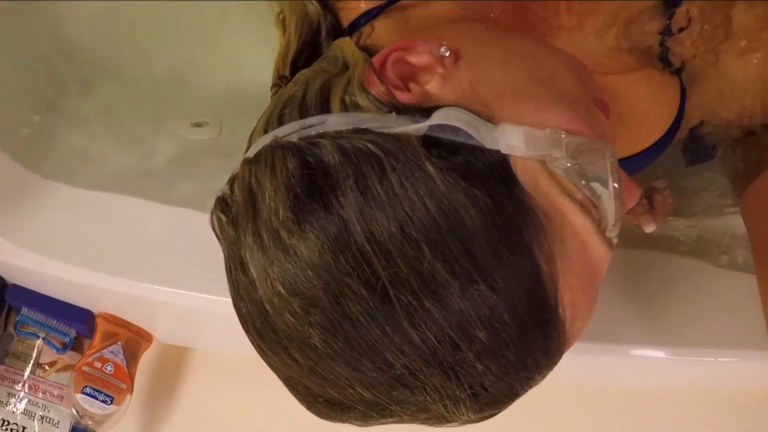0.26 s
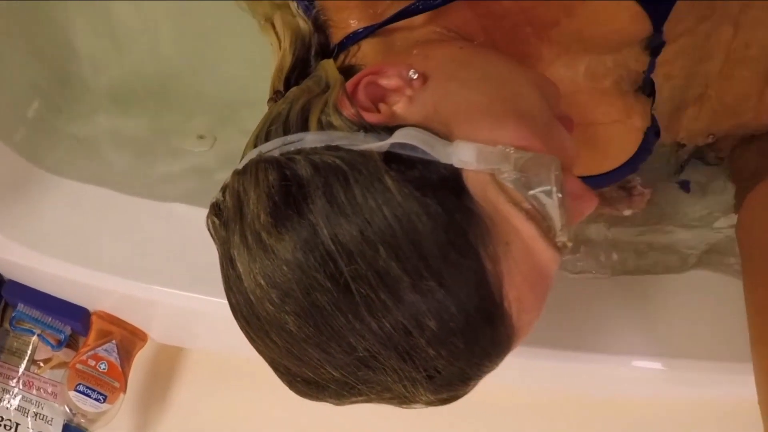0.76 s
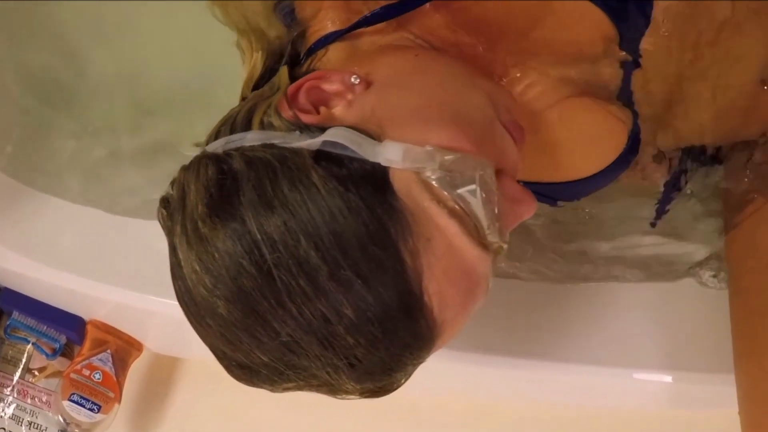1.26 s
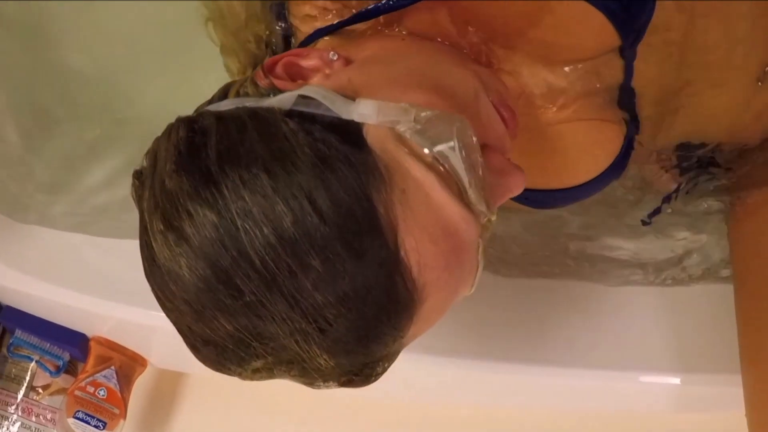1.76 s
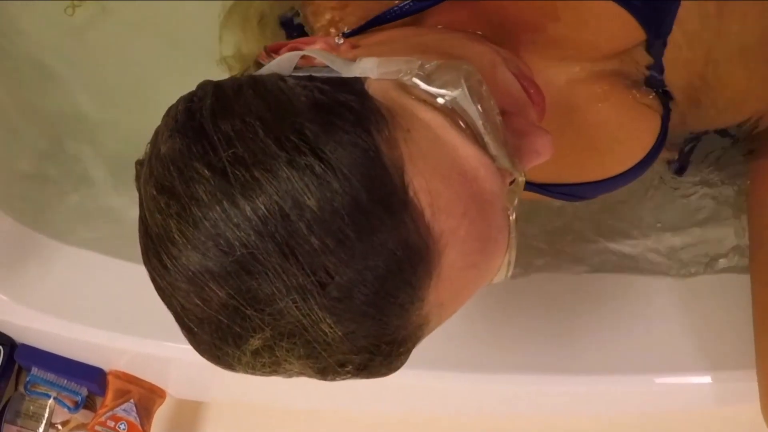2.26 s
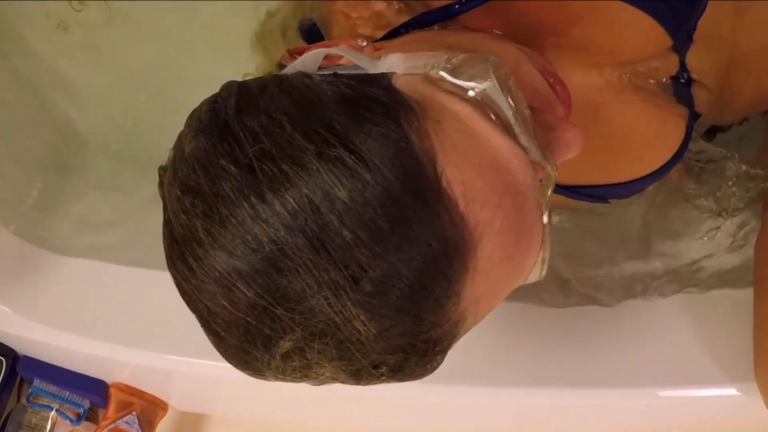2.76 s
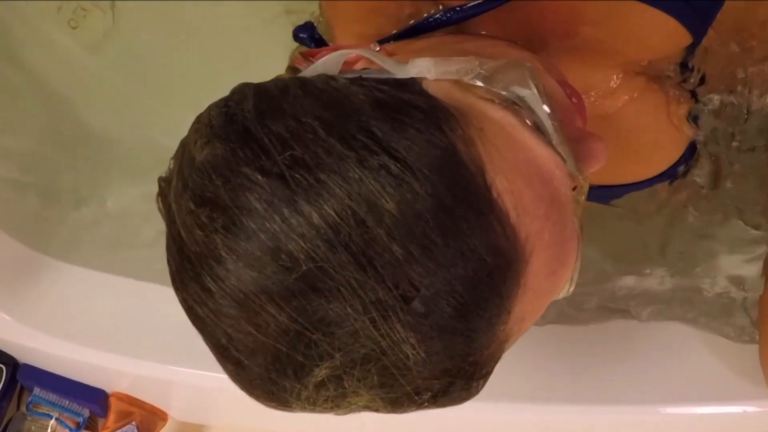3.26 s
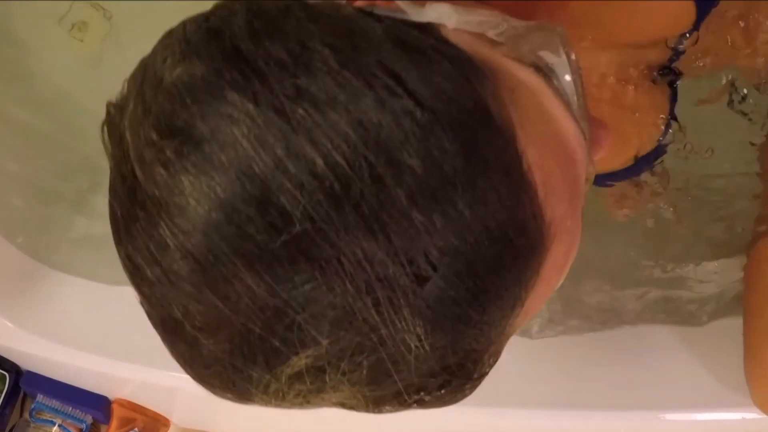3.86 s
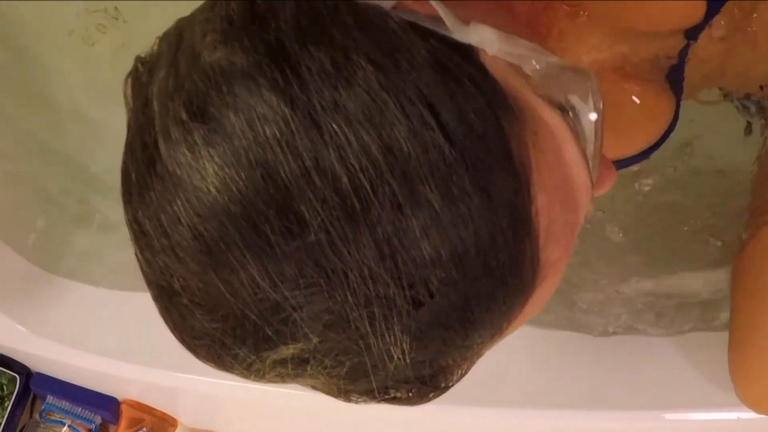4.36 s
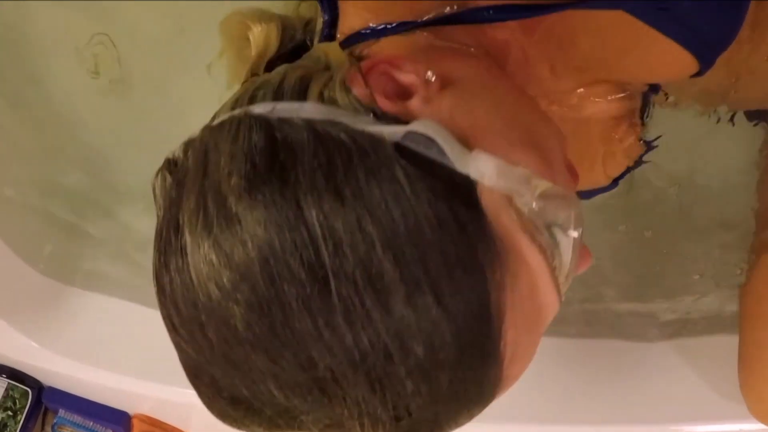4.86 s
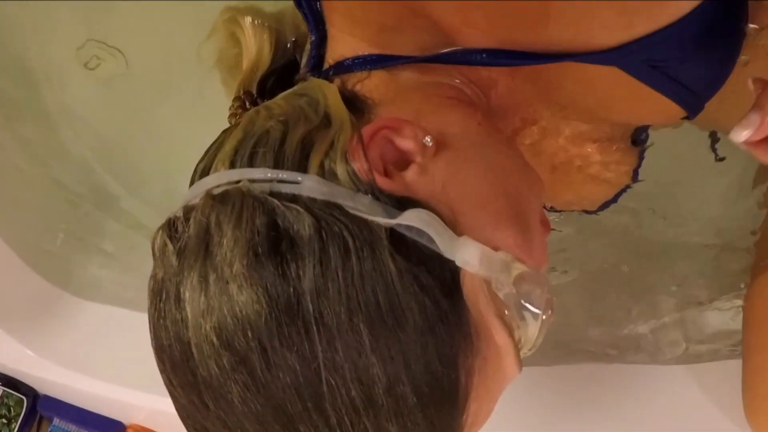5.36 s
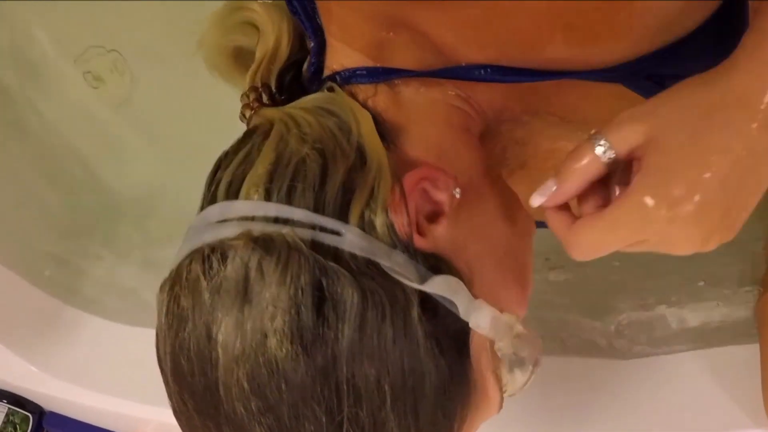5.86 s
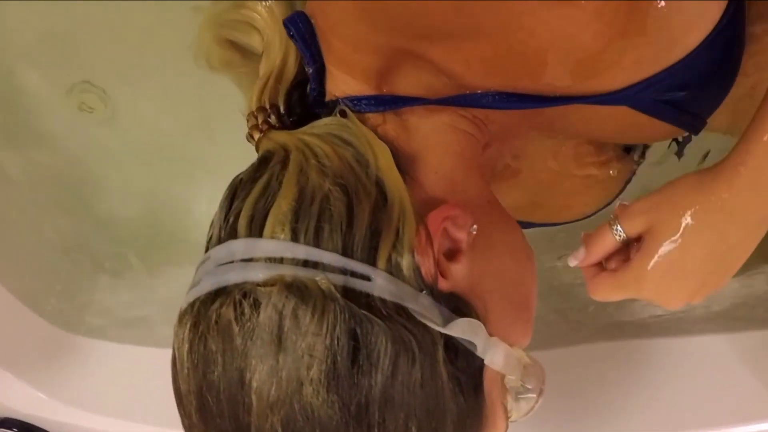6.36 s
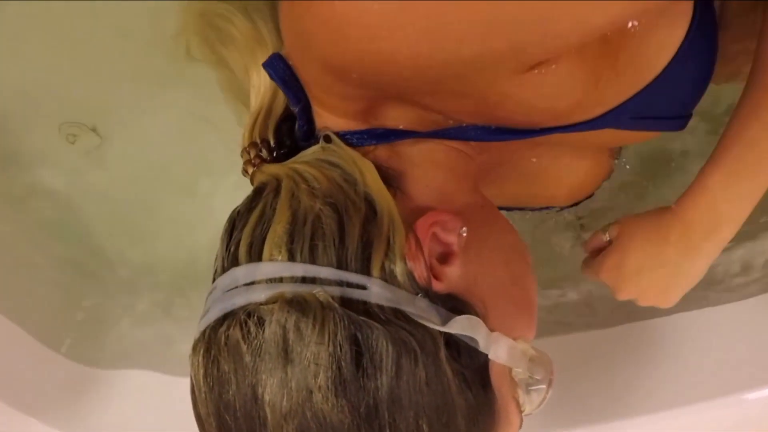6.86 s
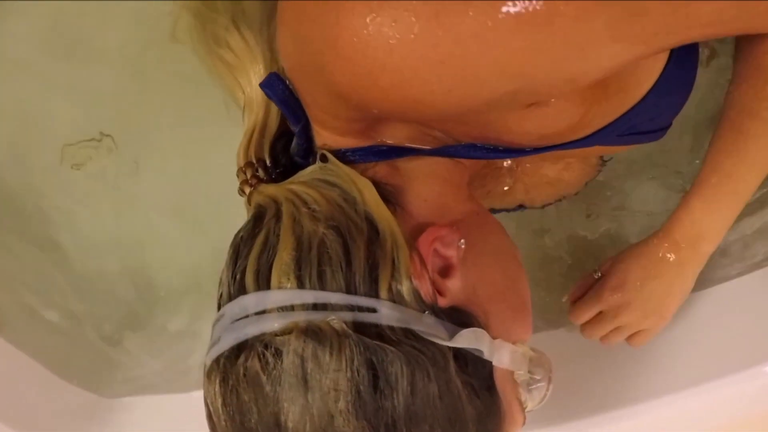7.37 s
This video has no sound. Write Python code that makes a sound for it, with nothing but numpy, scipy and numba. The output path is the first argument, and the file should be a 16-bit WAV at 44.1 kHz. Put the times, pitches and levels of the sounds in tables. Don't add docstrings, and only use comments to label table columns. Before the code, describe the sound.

Bath water laps softly with tiny ticking drips and thin trickles, while a hand bumps the microphone housing in low thuds. Bubbles ring and glug as the water surges around three and a half seconds, splashing again just after four. After a lull, a loud plop starts another splashy burst with rapid thumping, then calm. Close stereo, small reverberant bathroom, no bright top end.

```python
import sys
import numpy as np
from scipy import signal
from scipy.fft import rfft, irfft
from scipy.io import wavfile
from scipy.ndimage import uniform_filter1d
from numba import njit

SR = 44100
rng = np.random.default_rng(int(sys.argv[2]) if len(sys.argv) > 2 else 0)


def natural_amplitude(level_db):
    exponent = np.asarray(level_db, float) / 20
    return 10 ** exponent


def wav_record(signal):
    frames = np.transpose(np.atleast_2d(signal))
    bounded = np.clip(frames, -1, 1)
    quanta = np.round(bounded * 32767).astype(np.int16)
    wavfile.write(sys.argv[1], SR, quanta)


N = 335145


def level(x, db):
    return x * natural_amplitude(db) / np.sqrt(np.mean(x ** 2))


def colour(x, table):
    hz, db = np.transpose(table)
    f = np.fft.rfftfreq(x.shape[-1], 1 / SR) + 1
    gain = natural_amplitude(np.interp(np.log(f), np.log(hz), db))
    return irfft(rfft(x) * gain, x.shape[-1])


def smooth(x, size):
    return uniform_filter1d(uniform_filter1d(x, size), size)


def flicker(count, size):
    x = smooth(rng.standard_normal(count), size)
    return x / x.std()


def highpass(x, order, hz):
    return signal.sosfilt(signal.butter(order, hz, "high", fs=SR, output="sos"), x)


def swells(s, db, rise, fall, rest_db):
    late = np.arange(0, N, 64)[:, None] / SR - s
    power = natural_amplitude(db - np.where(late < 0, -rise * late, fall * late)) ** 2
    return np.repeat(10 * np.log10(power.sum(axis=1) + natural_amplitude(rest_db) ** 2), 64)[:N]


# (frequency [Hz], lead [rad])
PORTS = [(0, 2.6), (350, 1.25), (700, 1.3), (1400, .45), (2500, 1.0), (3700, 1.4)]


def sides(hz, pan_db, scatter):
    lead = np.interp(hz, *np.transpose(PORTS)) + scatter
    left = natural_amplitude(pan_db / 2) * np.exp(.5j * lead)
    right = natural_amplitude(-pan_db / 2) * np.exp(-.5j * lead)
    return np.array([left, right])


# (time [s], left minus right [dB])
WHERE = [(0, -1), (.85, -6), (1.5, 0), (3.3, 2), (3.6, 5.5), (3.95, 3), (4.15, -15.5), (5.05, -3.5),
         (5.3, 0.5), (5.9, 1), (6.15, -3), (7.6, 4)]


def where(s):
    return np.interp(s, *np.transpose(WHERE))


@njit
def ring(start, hz, decay, glide, gain, rise):
    out = np.zeros((2, N))
    for k in range(len(start)):
        z, w, n, shut = 1 + 0j, 2 * np.pi * hz[k] / SR, decay[k] * SR, 1.
        for i in range(int(start[k] * SR), min(N, int(start[k] * SR + 5 * n))):
            shut *= np.exp(-hz[k] / (rise * SR))
            out[0, i] += (gain[0, k] * z).imag * (1 - shut) ** 2
            out[1, i] += (gain[1, k] * z).imag * (1 - shut) ** 2
            z *= np.exp(1j * w - 1 / n)
            w = min(w * glide[k] ** (1 / n), 2.5)
    return out


# (frequency [Hz], spectral density [dB per Hz])
HUSH = [(45, -45), (120, -21.5), (200, 2.5), (374, -9), (767, -20.5), (1370, -16.5), (1520, -15.5),
        (2230, -39), (3420, -21.5), (5300, -22), (6310, -22.5), (7120, -29), (7690, -38), (10000, -100.5),
        (16900, -120)]


def hush():
    x = level(colour(rng.standard_normal((2, N)), HUSH), -55)
    out = 0
    for hz in (300, 700, 1500, 3000, 5000):
        low = signal.sosfilt(signal.butter(2, hz, fs=SR, output="sos"), x)
        out = out + low * natural_amplitude(1.8 * flicker(N, size=2500))
        x = x - low
    return out + x * natural_amplitude(1.8 * flicker(N, size=2500))


# (frequency [Hz], echo re direct [dB])
WALLS = [(100, -13), (450, -10.5), (900, -8), (1400, -10), (2200, -9), (3100, -7.5), (3750, -4.5),
         (4150, -8), (8000, -8)]


def bathroom(x):
    t = np.arange(int(.6 * SR)) / SR
    t60_s = .34
    first_path = t > .004
    echo = colour(level(rng.standard_normal((2, len(t))), -24.5), WALLS) * natural_amplitude(-60 * t / t60_s) * first_path
    mid_side = rfft(np.array([echo[0] + echo[1], echo[0] - echo[1]]))
    power = np.abs(mid_side) ** 2
    even = mid_side * np.sqrt(uniform_filter1d(power, size=300) / uniform_filter1d(power, size=20))
    mid, side = irfft(even, len(t)) * first_path * (t < .5) / 2
    echo = np.array([mid + side, mid - side])
    return signal.fftconvolve(x.mean(axis=0, keepdims=True), echo, axes=1)[:, :N]


# (time [s], peak [dB], left minus right [dB])
KNOCKS = [(.222, -15, 4), (.288, -23, 4), (1.987, -22.5, 4), (2.019, -15.5, -6), (2.057, -26, 8),
          (2.129, -16, -2), (2.172, -23, 3), (2.218, -24, -0.5), (4.357, -30, 23.5), (4.536, -22, 6),
          (4.575, -28, -4), (4.733, -30, -0.5), (5.763, -23.5, 4.5), (5.802, -22.5, 2), (.353, -30, 9.5),
          (6.195, -20, 2), (6.234, -17.5, 3.5), (6.26, -29, 6), (6.339, -22, 2), (6.373, -19.5, 4),
          (6.424, -18.5, 0), (6.459, -23.5, 7.5), (6.495, -16, -3), (6.588, -18, -6), (6.679, -20.5, -5.5),
          (6.746, -17.5, -4), (6.825, -24.5, -4), (6.889, -22.5, 0.5), (7.04, -28.5, 6.5),
          (7.556, -25.5, 5.5), (4.698, -28.5, -3.5), (5.29, -33, -1), (5.52, -32, -1), (5.56, -32, -0.5),
          (5.648, -27, 2), (5.85, -29, 2), (6.398, -19.5, -1)]
# (time [s], peak [dB], left minus right [dB])
SQUEEZES = [
    (.865, -29.5, -5),
    (.885, -28, -5),
    (.907, -23.5, -5),
    (0.93, -25, -5),
    (0.967, -24, -7),
    (1.007, -30.5, -10),
    (1.059, -33, -9),
]
# (frequency [Hz], spectral density [dB per Hz])
RUMBLE = [(12, -58), (20, -45), (37, -31.5), (57, -5), (86, 3.5), (168, -4), (285, -46), (362, -15),
          (400, -34.5), (520, -55.5), (880, -120)]
# (time [s], peak [dB], rise [dB per s], fall [dB per s])
SHIFTS = [
    (.25, -50, 12, 24),
    (.9, -42.5, 83, 38.5),
    (2.1, -47.5, 65, 60),
    (2.752, -51, 6.5, 6.5),
    (4.4, -48, 23, 12.5),
    (5.7, -48, 22.5, 35),
    (6.219, -37, 161, 19),
    (7.59, -45.5, 39, 36),
]


def grip():
    s, db, pan_db = np.transpose(KNOCKS + SQUEEZES)
    together = np.arange(len(s)) >= len(KNOCKS)
    pushes = np.zeros((2, N), complex)
    pushes[:, (s * SR).astype(int)] = natural_amplitude(db) * sides(1000 + 0 * s, pan_db, np.where(together, -1.1, 1.4))
    blunt = signal.sosfilt(signal.butter(3, 150, fs=SR, output="sos"), np.arange(4096) == 0)
    blunt = highpass(blunt, 2, 80)
    blunt += 1.4 * signal.lfilter(*signal.iirpeak(92, 1.8, fs=SR), blunt)
    knocks = signal.fftconvolve(pushes, signal.hilbert(blunt)[None], axes=1)[:, :N].real

    strength = natural_amplitude(-1.5 * np.log(rng.random(N)))
    pulses = rng.standard_normal((2, N)) * strength * (rng.random(N) < .01)
    pulses[1] -= 0.18 * pulses[0]
    rumble_db = swells(*np.transpose(SHIFTS), rest_db=-60)
    rumble = natural_amplitude(rumble_db + 6.0) * level(colour(pulses, RUMBLE), 0)
    return natural_amplitude(41.5) * highpass(knocks, 5, 64) + highpass(rumble, 9, 64) + natural_amplitude(-28) * rumble


# (time [s], length [s], pitch [Hz], level [dB])
TRICKLES = [(2.86, .45, 850, -52.5), (3.78, 0.57, 840, -50.5), (3.4, 0.2, 460, -55.5),
            (4.5, 0.105, 520, -50), (5.3, 0.11, 1000, -55), (4.75, 0.057, 610, -54), (6.8, .2, 3500, -56),
            (1.2, 0.13, 950, -55), (7.19, .09, 1170, -60), (.69, 0.135, 1660, -59), (4.77, 0.21, 3130, -55),
            (.89, 0.5, 1144, -60.5), (1.299, 0.764, 870, -58)]


def trickles():
    out = np.zeros((2, N))
    for s, length, hz, db in TRICKLES:
        i = np.arange(int(s * SR), int((s + length) * SR))
        tone = signal.lfilter(*signal.iirpeak(hz, 22, fs=SR), rng.standard_normal(len(i)))
        tone *= natural_amplitude(2.4 * flicker(len(i), size=700))
        fade = signal.windows.tukey(len(i), .3)
        out[:, i] += (signal.hilbert(level(tone, db)) * fade * sides(hz, 0, 0)[:, None]).real
    return out


def crowd(rate, centre_hz, octaves, cycles, glide, spread_db, scatter):
    u = rng.random((int(rate * N / SR), 6)).T
    s = u[0] * N / SR
    hz = centre_hz * 2 ** (octaves * (u[1] + u[5] - 1))
    gain = natural_amplitude(-spread_db * np.log(1 - u[2])) * sides(hz, 14 * (u[3] - .5), scatter * (u[4] - .5))
    return level(ring(s, hz, cycles / hz, glide + 0 * s, gain, 0.9), 0)


# (frequency [Hz], spectral density [dB per Hz])
SPRAY = [(120, -31.5), (400, -1), (590, 5), (1000, 4.5), (1290, -21), (1530, -10.5), (2050, -11.5),
         (3060, -7.5), (3630, -7), (5660, -17), (6480, -72.5), (7120, -56), (7690, -83.5), (10000, -103),
         (16900, -120)]
# (time [s], peak [dB], rise [dB per s], fall [dB per s], spray re slosh [dB])
SURGES = [(.3, -52, 17.5, 27, 2), (.87, -47, 40, 29, -12.5), (1.548, -54.5, 10.5, 14.5, 3),
          (2.85, -52.5, 50, 3, 3.5), (3.55, -36, 17.5, 19, -3), (4.401, -38, 78.5, 50, -6),
          (4.899, -46.5, 30, 59, -6), (5.75, -54.5, 45.5, 26, -11), (6.221, -39.5, 183, 27, -5),
          (6.9, -37, 84.5, 59, -6.5), (7.59, -55.5, 32, 22, 3)]


def water():
    s, db, rise, fall, spray_re_db = np.transpose(SURGES)
    slosh_db = swells(s, db, rise, fall, rest_db=-68)
    spray_db = swells(s, db + spray_re_db, rise, fall, rest_db=-72.5)
    slosh = crowd(rate=1000, centre_hz=600, octaves=1.35, cycles=8, glide=1.07, spread_db=2.2, scatter=5.0)
    fizz = crowd(rate=2800, centre_hz=2600, octaves=1.4, cycles=9, glide=1.04, spread_db=1.9, scatter=2.8)
    blips = crowd(rate=400, centre_hz=1700, octaves=1.2, cycles=14, glide=1.04, spread_db=2.0, scatter=2.5)
    spray = level(colour(fizz + 0.5 * rng.standard_normal((2, N)), SPRAY), 0)
    spray += np.clip((spray_db + 60) / 20, 0, .7) * blips
    surge_db = smooth(rng.standard_normal(N), 1800) * 50
    slosh_gain = natural_amplitude(slosh_db - 3.5 + 0.53 * surge_db + 2.75 * flicker(N, size=900))
    spray_gain = natural_amplitude(spray_db - 3.0 + surge_db + 1.4 * flicker(N, size=600))
    return slosh_gain * slosh + spray_gain * spray


# (time [s], peak [dB], centre [Hz], decay [ms])
SPLASHES = [(0.3206, -23.5, 3600, 33), (4.347, -26.5, 3570, 12), (4.7597, -21, 3660, 9.1),
            (6.165, -23.5, 3100, 6.6), (5.021, -31.5, 3900, 13), (6.1886, -22.5, 3680, 22),
            (6.2778, -21.5, 3300, 41), (6.4447, -31.5, 3650, 39), (6.797, -24.5, 3260, 80),
            (.241, -35, 3000, 15), (0.23, -40.5, 4300, 14), (2.828, -33, 3200, 25), (5.1, -36, 3900, 20),
            (3.766, -33, 3000, 22), (3, -32, 2000, 15), (4.872, -31, 3200, 20), (4.78, -34.5, 3600, 130),
            (6.0, -43, 3000, 60), (3.9, -40.5, 3200, 10), (6.788, -34, 3800, 12), (7.324, -33, 3100, 25),
            (4.32, -34.5, 5500, 9.3)]
# (frequency [Hz], spectral density [dB per Hz])
SHEET = [(350, -30), (1900, -9.5), (2900, -0.5), (3750, 2.5), (4150, -10.5), (5300, -14), (5800, -20.5),
         (7200, -30.5)]


def splashes():
    out = np.zeros((2, N))
    t = np.arange(int(.4 * SR)) / SR
    for s, db, hz, ms in SPLASHES:
        noise = rng.standard_normal((2, len(t)))
        band = colour(noise, [(f * hz / 3550, g) for f, g in SHEET])
        tail = signal.lfilter(*signal.iirpeak(3700, 5., fs=SR), noise[::-1])
        tail *= natural_amplitude(1.4 * flicker(len(t), size=300))
        band *= natural_amplitude(2.9 * flicker(len(t), size=120))
        burst = level(band, db - 11.0) * np.exp(-1000 * t / ms)
        burst += level(tail, db - 30) * np.exp(-t / 0.077)
        onset = 1 - np.exp(-t / 0.00031)
        i = int(s * SR)
        out[:, i:i + len(t)] += (burst * onset)[:, :N - i]
    return out


# (time [s], peak [dB])
CRACKLES = [(0.3187, -27), (0.8874, -39), (4.1844, -25.5), (4.347, -30), (4.4146, -31), (4.4452, -26),
            (4.7597, -34), (4.776, -39), (5.038, -31), (5.352, -48), (.877, -38), (6.143, -36),
            (5.022, -27.5), (6.166, -29), (6.1898, -27), (6.294, -25.5), (6.4469, -36), (6.798, -25),
            (7.3226, -33), (7.182, -42), (4.322, -39), (4.943, -33), (6.555, -39)]


def crackles():
    s, db = np.transpose(CRACKLES)
    hz = 4200 * (1 + 0.04 * rng.standard_normal(len(s)))
    return ring(s, hz, 0.00044 + 0 * s, 1 + 0 * s, natural_amplitude(db + 4.5) * sides(hz, -7.0, 0), 0.9)


# (time [s], peak [dB], pitch [Hz])
DRIPS = [(0.5112, -42.5, 2130), (0.5294, -40.5, 2800), (0.5444, -44, 1870), (0.6015, -41, 2820),
         (0.8555, -38.5, 2060), (0.9837, -39, 1950), (1.268, -40.5, 3860), (1.4711, -39, 3030),
         (1.7677, -40.5, 2880), (1.9904, -35, 3340), (2.04, -40.5, 1670), (2.3855, -41.5, 3380),
         (2.8535, -35.5, 1510), (7.29, -36.5, 3380), (.215, -42, 2540), (0.317, -24, 2780),
         (.692, -39.5, 2600), (2.698, -40.5, 1680), (2.7166, -36, 2200), (2.832, -32.5, 2650),
         (2.9244, -32.5, 2660), (2.9525, -36, 2580), (3.0508, -37.5, 1980), (3.2898, -36, 1420),
         (3.375, -30, 3530), (3.5307, -39, 1510), (3.572, -29.5, 3640), (3.916, -32.5, 1310),
         (4.2396, -39, 2900), (4.3204, -35.5, 3350), (4.517, -29, 3040), (4.6377, -35.5, 3870),
         (5.036, -33, 3180), (5.1, -51, 2500), (5.39, -49, 2570), (5.905, -45, 1500), (5.697, -40.5, 1640),
         (6.192, -25, 4070), (4.347, -30.5, 3520), (4.353, -35.5, 2290), (6.447, -31, 3560),
         (6.783, -34, 2580), (6.815, -31, 2050), (6.986, -33, 2280), (7.5213, -47, 1600),
         (7.5436, -40, 3670)]


def drips():
    s, db, hz = np.transpose(DRIPS)
    cycles = 7.4
    return ring(s, hz, cycles / hz, 1.04 + 0 * s, natural_amplitude(db - 0.5) * sides(hz, .5 * where(s), 0), .9)


# (time [s], peak [dB], pitch [Hz], tick re peak [dB])
DROPS = [(0.242, -39, 1330, -2), (0.3223, -35, 1480, 9.5), (0.8762, -32, 1270, -10.5),
         (2.0834, -26.5, 1590, -12.5), (3.1083, -28, 1640, -35.5), (3.357, -18, 1370, -20),
         (3.6252, -36, 1740, 3), (3.644, -36.5, 1760, 4), (3.766, -28.5, 1440, -1),
         (3.9893, -24, 1635, -9.5), (4.0621, -21.5, 2040, -14), (4.1665, -30.5, 2450, -10.5),
         (4.185, -41, 1800, 6.5), (4.348, -34.5, 2230, 0.5), (4.4138, -33.5, 1440, 3.5),
         (4.4467, -23, 1210, -4.5), (4.5578, -22.5, 1560, -18), (4.7611, -18, 1610, 0.5),
         (4.872, -32.5, 1410, 2), (5.236, -33.5, 1600, -1), (6.1425, -34.5, 2210, -19),
         (6.1636, -23.5, 1320, -2), (6.192, -1.5, 1510, -18), (6.281, -22.5, 1160, -9),
         (6.358, -21.5, 1420, -8.5), (6.448, -29, 1480, 3), (6.797, -22, 1940, -9),
         (7.3254, -27.5, 1790, -10)]


def drops():
    s, db, hz, tick_db = np.transpose(DROPS)
    tick_hz = 3240 + 27 * (db + tick_db + 26.0)
    pan_db = where(s)
    cavity_gain = natural_amplitude(db - 4.0) * sides(hz, pan_db, 0)
    tick_gain = natural_amplitude(db + tick_db + 8.0) * sides(tick_hz, pan_db, 0)
    cavity = ring(s, hz, 0.0024 + 0 * s, 1.05 + 0 * s, cavity_gain, .4)
    return cavity + ring(s, tick_hz, 0.0013 + 0 * s, 1 + 0 * s, tick_gain, 0.96)


# (time [s], peak [dB], pitch [Hz], decay [ms])
BUBBLES = [(.675, -44.5, 595, 14), (.888, -31.5, 277, 10.3), (2.821, -31, 563, 10), (2.869, -39, 400, 18),
           (3.027, -29.5, 451.5, 23), (3.027, -37.5, 720, 8.6), (3.655, -35, 520, 12),
           (3.675, -32, 605, 11), (3.288, -34, 269.5, 33), (3.383, -31, 306, 7.3), (3.524, -44.5, 348, 11),
           (3.573, -28.5, 680, 12), (4.433, -31.5, 403, 23), (2.84, -28, 636, 11), (4.027, -36.5, 458, 21),
           (4.292, -31, 617, 14), (4.311, -28, 453, 19), (4.323, -33, 427, 12), (4.361, -25.5, 458, 5),
           (4.405, -23, 775, 8.4), (4.456, -22.5, 696, 5.7), (4.754, -44.5, 577, 26.2),
           (4.856, -40, 568, 34), (4.945, -44, 536, 15), (4.645, -45, 515, 18), (6.293, -29.5, 598, 14.5),
           (6.32, -37, 594, 17), (6.435, -34, 342, 19), (6.795, -30.5, 307, 29), (6.797, -17.5, 720, 2),
           (6.869, -35, 615, 13), (.325, -46, 500, 15), (2.711, -43, 565, 12), (2.85, -44, 351, 20),
           (2.928, -45, 335, 14), (2.981, -39.5, 348, 19), (3.378, -30, 456, 11), (3.4, -30, 596, 16),
           (4.271, -45, 743, 8.5), (4.53, -31, 554, 11.6), (4.62, -45, 518, 12), (5.036, -48, 747, 9.9),
           (6.99, -37, 418, 11), (7.062, -41, 402, 21), (3.95, -41, 379, 14), (6.954, -31, 413, 5)]
# (time [s], peak [dB], pitch [Hz])
SMALL_BUBBLES = [(.169, -46.5, 1180), (0.282, -41, 1334), (.29, -45, 1130), (2.855, -37, 2000),
                 (3.03, -41, 900), (4.947, -43, 1233), (4.985, -45.5, 800), (3.84, -45, 1800),
                 (4.0, -41.5, 1610), (6.96, -39.5, 3760), (1.517, -44.5, 1170), (3.11, -33, 820),
                 (3.183, -38.5, 813), (3.237, -41, 830), (3.354, -25, 1027), (3.469, -34.5, 790),
                 (3.625, -30.5, 828), (3.687, -24.5, 791), (3.712, -29, 654), (3.305, -34.5, 1135),
                 (3.775, -36.5, 1484), (4.157, -40.5, 865), (4.19, -42, 900), (5.4178, -41, 1464),
                 (6.209, -26.5, 1630), (6.226, -29, 1560), (6.33, -32, 1184), (6.468, -41, 1046),
                 (6.405, -37, 1150), (4.931, -45, 1240), (6.902, -34.5, 1380), (7.184, -45, 1210),
                 (0.251, -45.5, 1040), (.885, -47, 853), (5.823, -43.5, 902), (3.914, -38, 885),
                 (4.062, -38, 900), (4.334, -35, 884), (4.503, -29, 946), (3.5, -36, 1053),
                 (3.125, -40, 1140), (4.292, -38.5, 956), (4.315, -32, 821), (3.11, -34.5, 1550),
                 (3.575, -37, 857), (4.519, -43.5, 918), (4.814, -34.5, 1270), (4.89, -39, 1146),
                 (5.472, -44.5, 985), (5.695, -40.5, 1173), (6.165, -28.5, 1122), (6.358, -26, 1054),
                 (6.829, -41, 827), (6.957, -33.5, 865), (4.455, -29.5, 804), (7.2, -41, 800)]


def bubbles():
    cycles = 10.5
    small = [(s, db, hz, 1000 * cycles / hz) for s, db, hz in SMALL_BUBBLES]
    s, db, hz, ms = np.transpose(BUBBLES + small)
    snap_gain = natural_amplitude(db - 15.5) * sides(2.4 * hz, where(s), 0)
    body_gain = natural_amplitude(db + 2.0) * sides(hz, where(s), 0)
    snap = ring(s, 2.1 * hz, 2.1 / hz, 1.0 + 0 * s, snap_gain, 0.19)
    return snap + ring(s, hz, np.clip(ms, 2, 60) / 1000, 1.08 + 0 * s, body_gain, 0.17)


# (time [s], length [s], first pitch [Hz], last pitch [Hz], level [dB])
GLUGS = [(0.67, 0.098, 272, 613, -41.5), (0.772, 0.044, 767, 834, -48.5), (6.657, 0.034, 616, 910, -45),
         (6.93, .03, 455, 805, -42), (6.195, 0.013, 750, 420, -23.5), (3.56, .2, 170.3, 190, -50.5),
         (3.09, .13, 261, 238, -37), (3.601, 0.13, 299.2, 780, -40.5), (4.455, 0.04, 458, 464, -20),
         (5.707, 0.095, 314, 357, -34.5), (5.821, 0.097, 336, 773, -51.5), (6.198, 0.057, 412, 370, -28.5),
         (6.656, 0.0217, 904, 1090, -28.5), (6.669, 0.026, 1196, 1680, -39.5),
         (6.673, 0.014, 1050, 1164, -30.5), (6.907, 0.044, 395.5, 398, -27.5),
         (7.172, 0.1, 421.5, 460, -42.5), (7.245, 0.073, 477, 1006, -52.5)]


def glugs():
    out = np.zeros((2, N))
    for s, length, first_hz, last_hz, db in GLUGS:
        i = np.arange(int(s * SR), int((s + length) * SR))
        t = i / SR - s
        shake = uniform_filter1d(uniform_filter1d(rng.standard_normal((2, len(i))), 120), 120) * 13
        f = first_hz * (last_hz / first_hz) ** (t / length) * (1 + .035 * shake[0])
        flutter = natural_amplitude(2.5 * shake[1])
        edge = np.clip(np.minimum(t / 0.003, (length - t) / 0.0027), 0, 1)
        fall_db = 13 * (first_hz / last_hz) ** 2.3
        shape_db = np.interp(t / length, [0, 0.18, 1], [-4, 0, -fall_db])
        phase = 2 * np.pi * np.cumsum(f) / SR
        tone = edge * flutter * natural_amplitude(db + shape_db + 4.0) * np.exp(1j * phase)
        out[:, i] += (tone * sides(f, 0.36 * where(s), 0)).imag
    return out


def scene():
    wet = glugs() + bubbles() + drops() + drips() + crackles() + splashes() + water()
    return wet + bathroom(wet) + grip() + hush() + trickles()


def top_cut(x):
    return signal.sosfilt(signal.butter(12, 7840, fs=SR, output="sos"), x)


# (frequency [Hz], gain [dB])
HOUSING = [(2000, 0), (2450, -1.5), (2950, 0.5), (3350, -0.5), (3780, 1.5), (4200, 0.5), (5350, 1.5),
           (5650, -3.5), (7400, -1)]
# (time [s], length [s])
TOP_SHUT = [(2.14, .15), (2.44, .28), (2.78, .16), (3.0, .2), (3.3, .14), (3.52, .58), (6.5, .27),
            (6.86, .4)]


def record(dry):
    x = signal.sosfilt(signal.ellip(8, .2, 45, 7500, fs=SR, output="sos"), colour(dry, HOUSING))
    f, t, z = signal.stft(x, SR, nperseg=1024)
    near = uniform_filter1d(np.abs(z), size=15, axis=1)
    weak = np.abs(z) < near * np.clip((f[:, None] - 4200) / 2400, 0, 1.3)
    spell = np.any([(t > s) & (t < s + length) for s, length in TOP_SHUT], axis=0)
    shut = spell & (f[:, None] > 6950)
    mix = signal.istft(np.where(weak | shut, .05, 1) * z, SR, nperseg=1024)[1][:, :N]
    return top_cut(mix)


dry = scene()
out = record(dry)
wav_record(out)
```